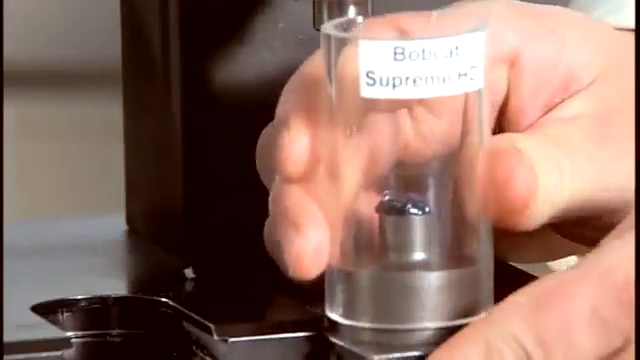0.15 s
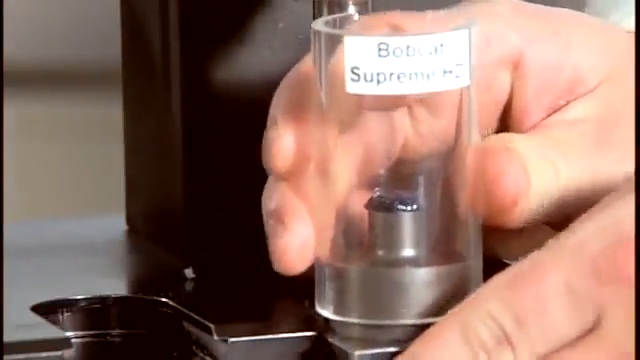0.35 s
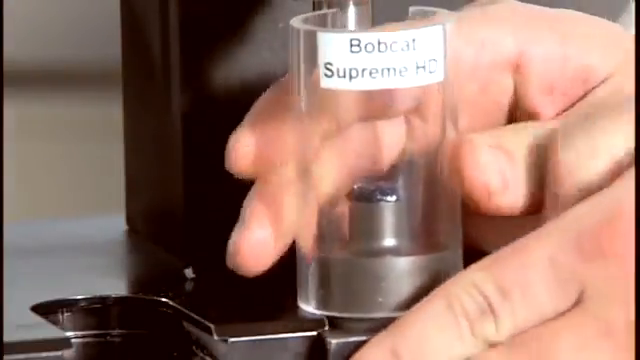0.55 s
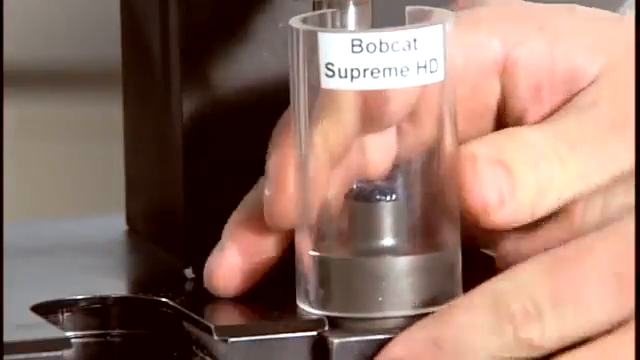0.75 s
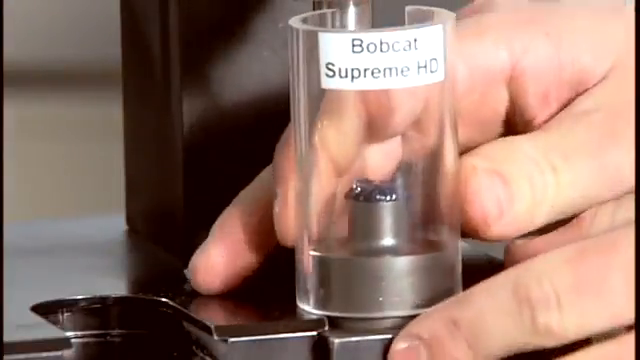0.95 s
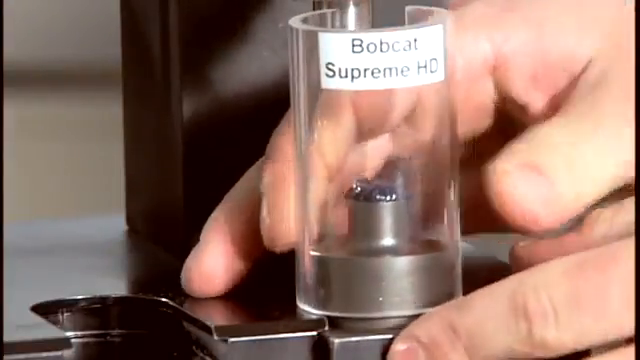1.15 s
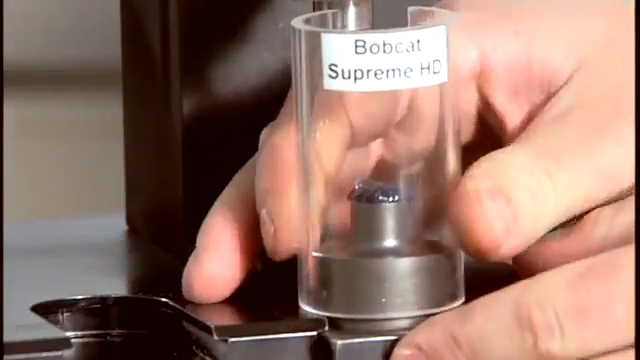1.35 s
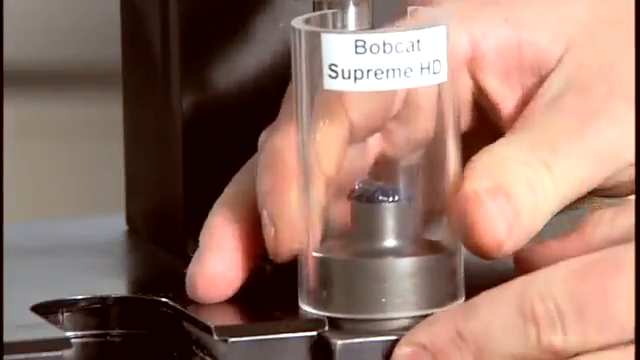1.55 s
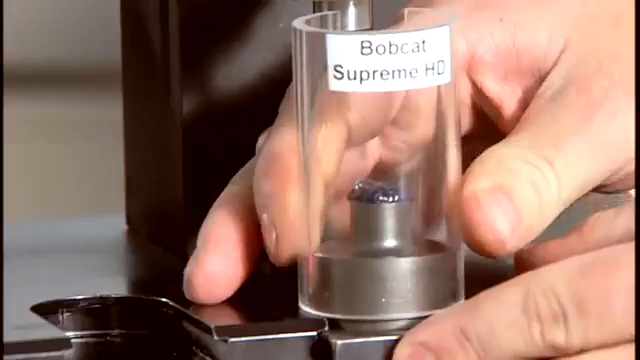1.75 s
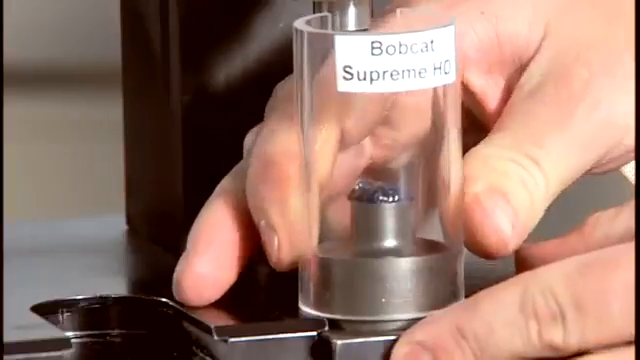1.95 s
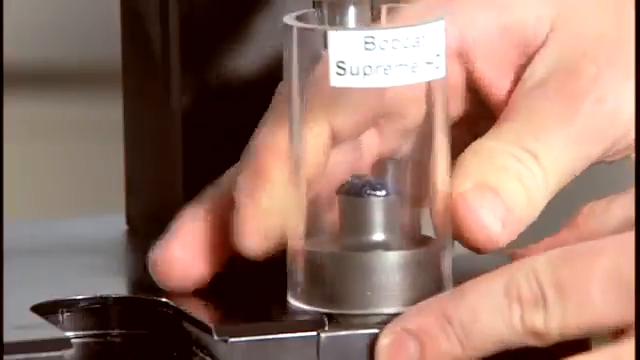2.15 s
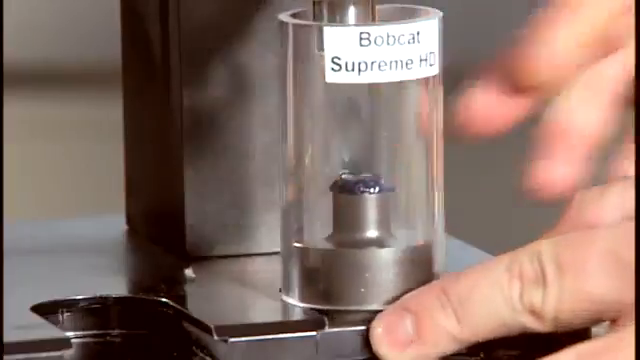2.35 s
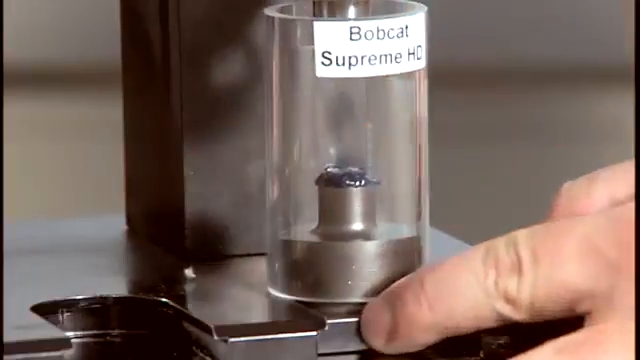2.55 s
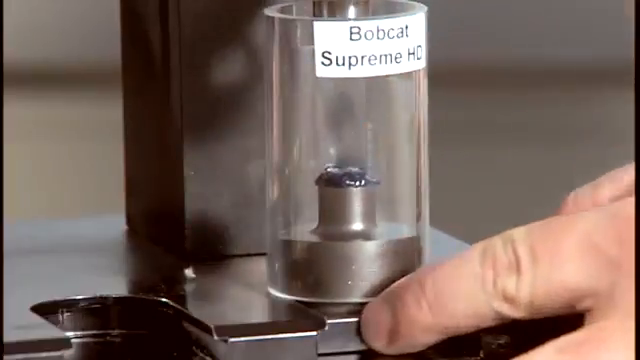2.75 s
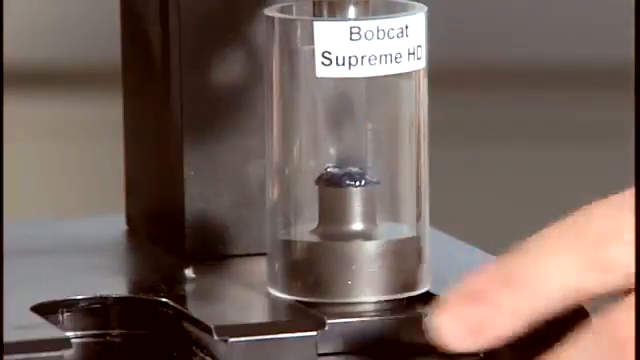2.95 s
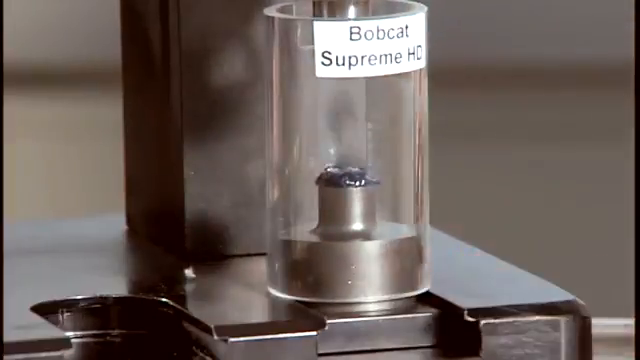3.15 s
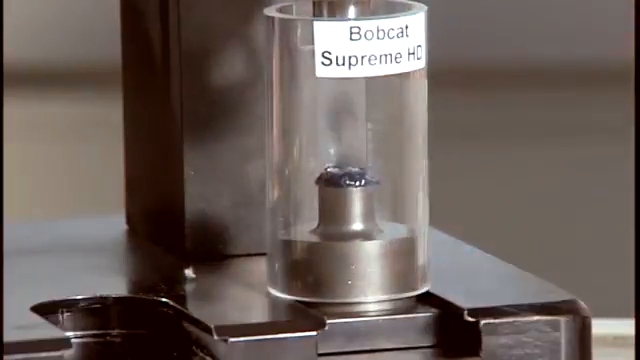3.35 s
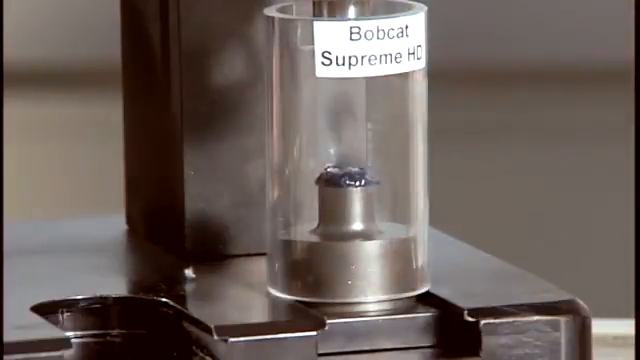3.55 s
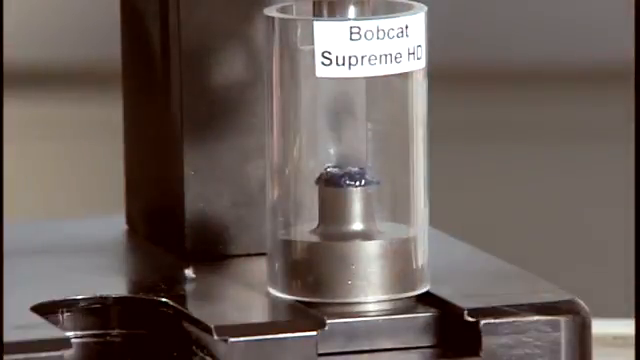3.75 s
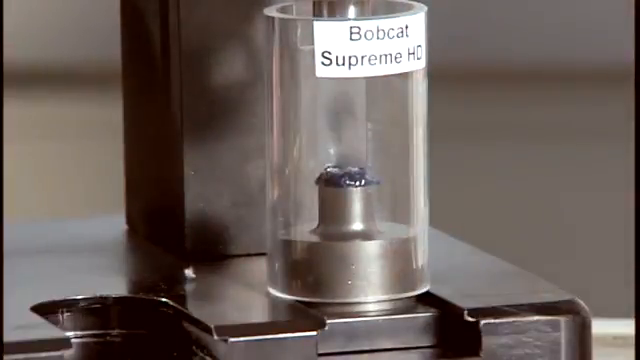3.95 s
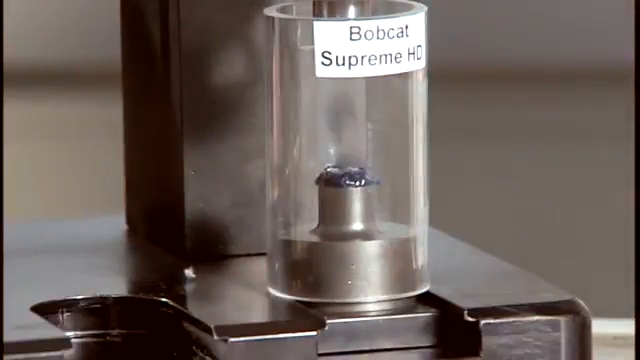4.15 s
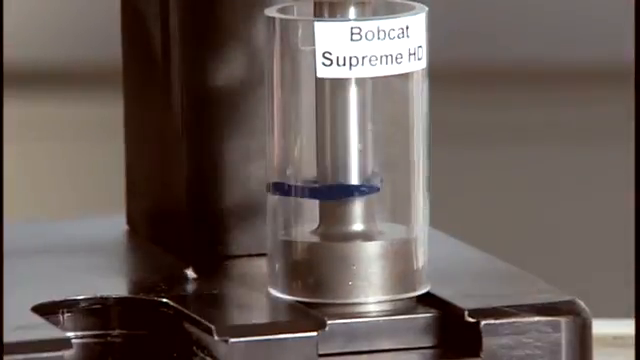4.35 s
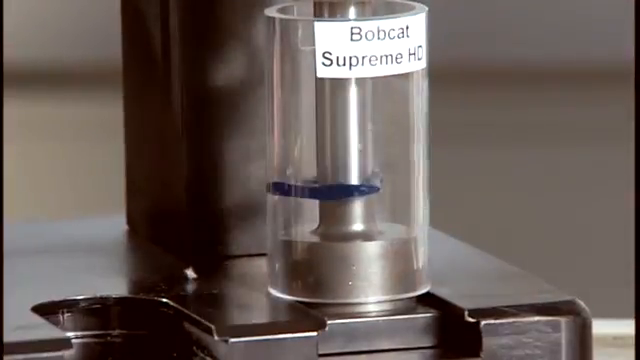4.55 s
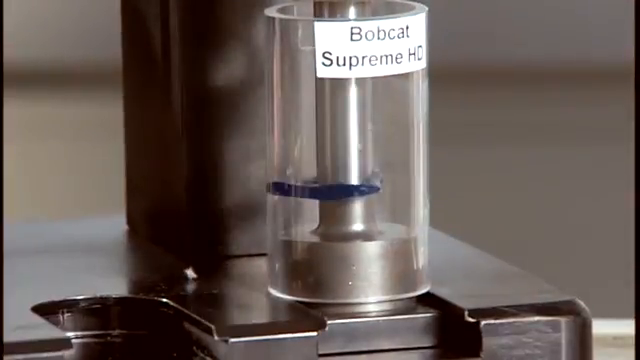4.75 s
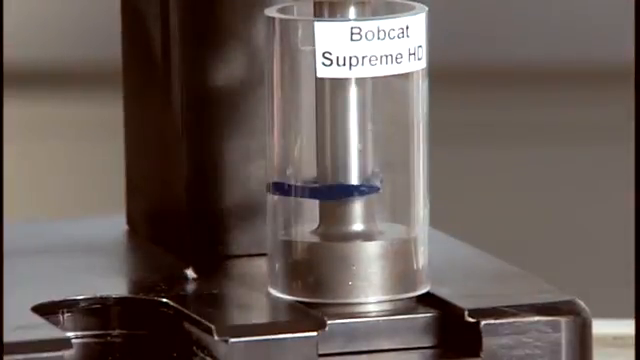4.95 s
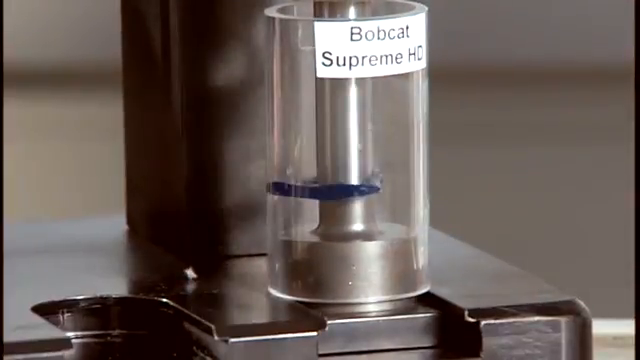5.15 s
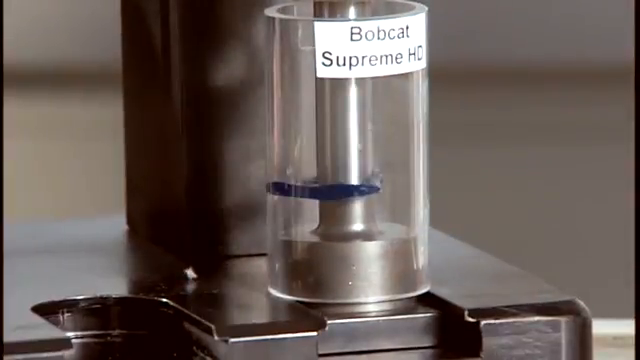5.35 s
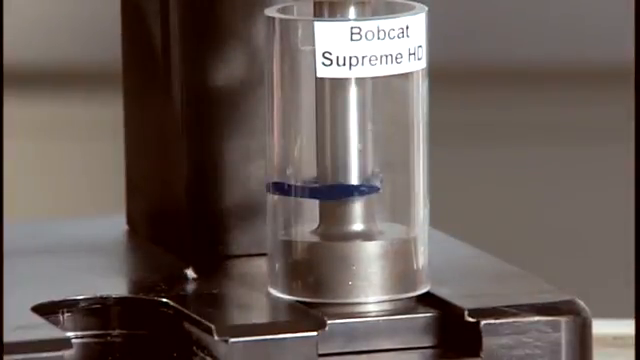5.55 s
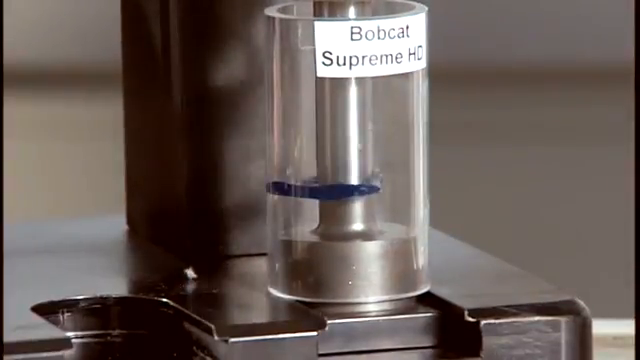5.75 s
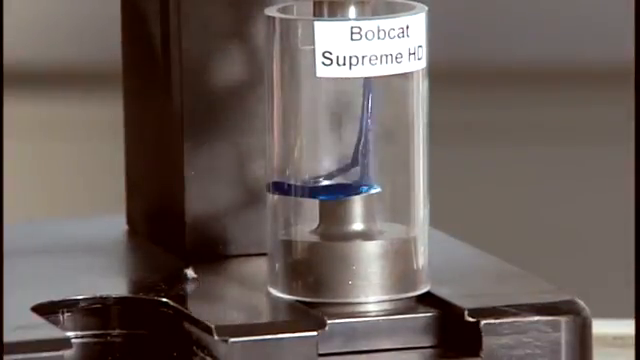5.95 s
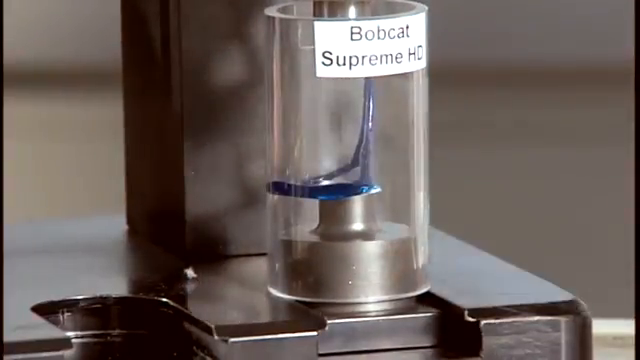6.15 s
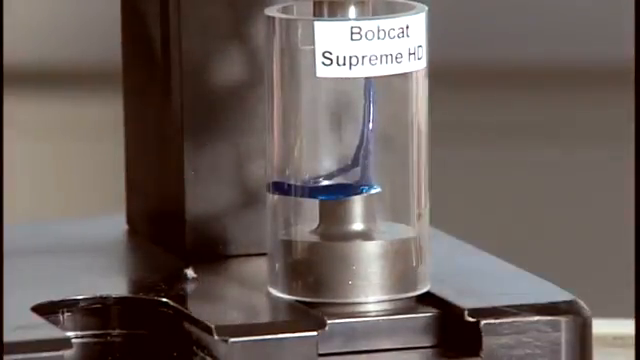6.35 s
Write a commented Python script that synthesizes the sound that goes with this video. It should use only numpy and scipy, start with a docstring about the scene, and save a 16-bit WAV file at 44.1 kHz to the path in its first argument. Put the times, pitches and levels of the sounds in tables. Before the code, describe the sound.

Hands fidget parts into place with clicks and soft rustling, a steel ram slams hard with a rattling ring, then clacks back up.

```python
"""Pneumatic impact rig in a small workshop

Hands seat a plastic tube and steel holder on the base plate: filtered noise knocks excite damped and ringing modes.
Short noise clicks make the ticks, and grainy noise the rustling sleeves. The ram slams onto the anvil, the frame
rattles, air vents as gated hiss and the ram clacks back up. Wavering sines and shaped noise make fan, mains hum
and hiss under all; heavy blows thud in the bench, a faint thin tone comes and goes, and the room adds a tail.
"""
import sys
import numpy as np
from scipy import signal
from scipy.fft import rfft, irfft, next_fast_len
from scipy.io import wavfile
from scipy.ndimage import uniform_filter1d

SR = 44100
rng = np.random.default_rng(int(sys.argv[2]) if len(sys.argv) > 2 else 0)


def wrap_up_sound(samples):
    """Save the sound to the file named by the first command line argument, as 16-bit audio."""
    columns = np.atleast_2d(samples).T
    # keep every value between -1 and 1, then stretch to whole-number steps
    tamed = np.clip(columns, -1, 1)
    steps = np.round(tamed * 32767).astype(np.int16)
    wavfile.write(sys.argv[1], SR, steps)


N = 286650
PAD = 4096  # samples ahead of time zero, so that a blow may start before it
t = np.arange(N) / SR

# long rings of the steel anvil: (frequency [Hz], level [dB], t60 [s])
ANVIL_MODES = [(1233, -6, 0.38), (1610, -14, 0.45), (1680, -15, 0.57), (2353, -12, 0.67), (3203, -13, 0.45),
               (3666, -12, 0.42), (3854, -22, 0.44), (4226, -23, 0.45), (4344, -16, 0.32),
               (4872, -13, 0.49), (5087, -18, 0.31), (5195, -26, 0.65), (5351, 0, 0.19), (5475, -17, 0.34),
               (5970, -35, 0.58), (6584, -18, 0.45), (7058, -17, 0.32), (7827, -15, 0.29),
               (8021, -28, 0.55), (8263, -17, 0.3), (8769, -21, 0.35), (9076, -23, 0.38), (9119, -24, 0.34),
               (9792, -21, 0.21), (9975, -14, 0.17), (10380, -20, 0.21), (10900, -21, 0.18),
               (12070, -16, 0.11), (13950, -28, 0.17), (14900, -27, 0.21), (1095, -14, .4), (1440, -16, .6),
               (1838, -12, .5), (3355, -14, .45)]
# broad resonances of the plastic tube: (frequency [Hz], level [dB], t60 [s])
TUBE_MODES = [(594, -1, 0.025), (1143, 2, 0.01), (1716, 3, 0.01), (2540, 0, 0.0046), (3838, 3, 0.015),
              (5830, -1.5, 0.0066)]


def undb(db):
    """Amplitude ratio of a level in decibels."""
    return 10 ** (np.asarray(db) / 20)


def decay(age, t60):
    """Exponential damping: the level falls by 60 dB in t60 seconds."""
    return np.exp(-np.log(1000) * age / t60)


def colour(x, points):
    """Zero-phase spectral shaping: gain in dB runs straight between (Hz, dB) points over log frequency."""
    hz, db = np.transpose(points)
    size = next_fast_len(len(x))
    f = np.maximum(np.arange(size // 2 + 1) * SR / size, 1)
    gain = undb(np.interp(np.log(f), np.log(hz), db))
    return irfft(rfft(x, size) * gain, size)[:len(x)]


def level(x, db):
    """Scales a signal to an rms level in dB."""
    return x * undb(db) / np.sqrt(np.mean(x ** 2))


def walk(rate):
    """Slow random modulation of rms 1: random steps, rate of them a second, smoothed by two moving averages."""
    k = int(SR / rate)
    steps = np.repeat(rng.standard_normal(N // k + 1), k)
    smooth = uniform_filter1d(uniform_filter1d(steps, k), k)
    return level(smooth[:N], 0)


def add(track, s, sound):
    """Superposition: mixes a sound into a padded track at time s."""
    i = PAD + int(s * SR)
    sound = sound[:len(track) - i]
    track[i:i + len(sound)] += sound


def rings(modes, split_hz=0.):
    """Modal decay: one damped sine a row, with a weaker twin that beats against it if split_hz is not zero."""
    hz, db, t60 = np.array(modes).T[:, :, None]
    s = t[:SR * 3 // 4]
    # the random split grows with the square of frequency; split_hz is its spread at 4 kHz
    twin_hz = hz + split_hz * (hz / 4000) ** 2 * rng.standard_normal(hz.shape)
    pair = np.sin(2 * np.pi * hz * s) + .4 * np.sin(2 * np.pi * twin_hz * s)
    fade = np.minimum((s[-1] - s) / .1, 1)
    return undb(db) * pair * decay(s, np.maximum(t60, .003)) * fade


def workshop():
    """Tonal machine noise: wavering motor and mains lines over broadband rumble and hiss."""
    # fan and mains hum: (frequency [Hz], level [dB rms], waver [dB])
    hum_lines = [(28.5, -65.5, -1.5), (53.2, -51.5, 2), (107.3, -59, 0), (119.46, -54, -0.5),
                 (154.8, -72, 4), (237.7, -71.5, 2)]
    # room and microphone noise: (frequency [Hz], relative density [dB per Hz])
    floor_spectrum = [(12, -5.5), (30, 0), (60, -3.5), (100, -4.5), (160, -10.5), (300, -19), (600, -25.5),
                      (1200, -34.5), (2500, -40), (6000, -45), (15000, -49.5)]
    floor_db = -53  # rms
    lines = 0
    for hz, db, waver_db in hum_lines:
        gain = np.sqrt(2) * undb(db + waver_db * walk(2.5))
        cycles = hz * t + rng.random() + .015 * walk(2.5)
        lines = lines + gain * np.sin(2 * np.pi * cycles)
    return lines + level(colour(rng.standard_normal(N), floor_spectrum), floor_db)


def blows(table, metal_modes, body_modes, crack_db):
    """Impact excitation: noise drives a damped body and steel modes ring; row two is what shakes the frame."""
    lead = 128  # silent samples ahead of each blow, room for the zero-phase filter
    out = np.zeros((2, N + PAD))
    metal, body = rings(metal_modes, split_hz=20.2), rings(body_modes)[:, :2048]
    age = t[:metal.shape[1]]
    for s, db, bass_db, edge_db, treble_db, t60, ring_db, frame_db in table:
        # every blow lands on another spot, so the modes share out a little differently
        steel, hollow = (undb(1.5 * rng.standard_normal(len(m))) * (-1) ** np.arange(len(m)) @ m
                         for m in (metal, body))
        contact = np.minimum(age / 0.00044, 1) * decay(age, np.clip(t60, .01, .2))
        push, crack = rng.standard_normal((2, len(age))) * contact
        # the push sounds through the body, the crack goes straight to the air
        clatter = signal.fftconvolve(push, hollow)[:len(age)] + undb(crack_db) * crack
        clatter /= np.sqrt(np.sum(hollow ** 2) + undb(2 * crack_db))
        tilt = [(80, bass_db - 33), (300, bass_db + 5), (450, bass_db + 2), (800, bass_db + 3),
                (1500, 0.013), (3700, edge_db), (8000, treble_db), (15000, treble_db - 10.5)]
        # the rings build up over the first ms of contact
        ring = undb(ring_db) * steel * np.minimum(age / 0.0027, 1)
        for track, sound in zip(out, (clatter + ring, undb(frame_db) * clatter)):
            add(track, s - lead / SR, undb(db) * colour(np.pad(sound, lead), tilt))
    return out


def slams():
    """Hard steel impact: an earlier blow rings out, then the ram comes down on the grease and on steel."""
    # (time [s], level [dB], bass [dB], edge near 4 kHz [dB], treble near 8 kHz [dB],
    #  clatter t60 [s], ring [dB], frame [dB])
    slam_table = [(-.03, -40.5, -8, -5, -19, 0.09, -9, 0), (4.2955, -52, -2, 0, 0, 0.058, -30, -10),
                  (4.3137, -28, -1.5, -3, -1, 0.07, -27, 1), (4.3258, -17, 1, 0, -4, 0.042, -12.5, -7.5)]
    # broad resonances of the ram: (frequency [Hz], level [dB], t60 [s])
    ram_modes = [(1159, 5, 0.027), (1740, -6, 0.011), (3260, 1, .005)]
    return blows(slam_table, ANVIL_MODES, ram_modes, crack_db=19)


def room(x):
    """Reverberation: weak frame modes and wall echoes form a dense tail, each octave dying at its own pace."""
    # decay of the tail: (frequency [Hz], t60 [s])
    tail_decay = [(150, 0.68), (500, 0.63), (2000, 0.48), (6000, 0.4), (12000, 0.27)]
    gap_s = 0.002  # silence before the tail, and then the time of its rise
    hz, t60 = np.transpose(tail_decay)
    age, tail = t[:SR * 3 // 4], 0
    for centre in 125 * 2. ** np.arange(8):
        octave = [(centre / 2, -40), (centre / 1.9, -3), (centre, 0), (centre * 1.7, -3), (centre * 2, -40)]
        band = colour(rng.standard_normal(len(age)), octave)
        tail = tail + band * decay(age, np.interp(np.log(centre), np.log(hz), t60))
    tail = tail * np.clip(age / gap_s - 1, 0, 1)
    return signal.fftconvolve(x, tail / np.sqrt(np.sum(tail ** 2)))[:len(x)]


def sleeves():
    """Stick-slip friction of fibres: a soft grainy hiss swells and fades with each move."""
    # moves: (loudest time [s], level [dB], rise over 12 dB [s], fall over 12 dB [s])
    moves = [(.62, -66, .35, .1), (1.31, -64.5, .12, .1), (1.8, -64, .4, .35), (2.35, -61, .25, .3),
             (3.32, -64.5, .6, .55), (6.38, -70, .2, .2)]
    # colour of the cloth: (frequency [Hz], relative density [dB per Hz])
    cloth_spectrum = [(200, -9), (700, 5), (1500, -4), (3000, -7.5), (6000, -15.5), (10000, -14),
                      (15000, -35)]
    gain = 0
    for s, db, rise, fall in moves:
        distance = (t - s) / np.where(t < s, rise, fall)
        gain = gain + undb(db - 12 * distance ** 2)
    grains = rng.standard_normal(N) * undb(1.38 * walk(300) + 0.6 * walk(25))
    return gain * level(colour(grains, cloth_spectrum), 0)


def knocks():
    """Contact stiffness: of these light knocks of holder and tube, the duller have more bass and last longer."""
    # (time [s], level [dB], edge near 4 kHz [dB], treble near 8 kHz [dB])
    knock_table = [(.195, -48, -28, -32), (.2398, -39, -6.5, -30), (.2843, -52, -20, -24),
                   (.332, -52.5, -22, -20), (.4645, -48, -20, -22), (.5254, -48.5, -17, -22),
                   (.573, -50, -6, -3), (.598, -47, -22, -26), (.644, -39.5, -1, -14),
                   (.6485, -30, -3, -12), (.7225, -29, -3, -11), (.7815, -40.5, -22, -26),
                   (.8484, -37, -3, -20), (1.3075, -40.5, -23, -30), (1.3521, -34.5, -10, -29),
                   (1.53, -46, -16, -20), (2.2179, -36.5, -8, -20), (2.227, -37, -7, -18),
                   (2.266, -48, -14, -19), (2.3067, -43, -6, -8), (2.359, -41, -5, -7),
                   (2.373, -45, -10, -8), (5.8062, -40, -1.5, -12), (5.839, -49, -7, -10),
                   (5.8562, -39.5, -4, 0)]
    # long rings of the holder: (frequency [Hz], level [dB], t60 [s])
    holder_modes = [(598, -4, .12), (1690, -8, .12), (2169, -16, .15), (2353, -20, .6), (3365, -22, .4),
                    (3666, -8, .28), (3865, -4, .16), (5346, -13, .22), (5626, -12, .2), (5846, -10, .22),
                    (7488, -20, .22), (8700, -18, .15)]
    base_bass_db, bass_per_dull_db = -3, .15
    base_t60_s, t60_s_per_dull_db = .042, .0008
    ring_db, frame_db = -19, -14
    contacts = []
    for s, db, edge_db, treble_db in knock_table:
        dull_db = -edge_db
        bass_db = base_bass_db + bass_per_dull_db * dull_db
        t60 = base_t60_s + t60_s_per_dull_db * dull_db
        contacts.append((s, db, bass_db, edge_db, treble_db, t60, ring_db, frame_db))
    return blows(contacts, holder_modes, TUBE_MODES, crack_db=15.5)


def ticks():
    """Brief impulses have broad spectra: millisecond noise clicks, dull or sharp."""
    # dry ticks of fingers, cloth and valves: (time [s], level [dB], treble at 9 kHz [dB])
    tick_table = [(.349, -49, -9), (.374, -45, -7), (1.0435, -37, -10), (1.0715, -31.5, -12),
                  (1.1677, -45, -22), (1.4604, -45, -1), (1.4684, -35, -6), (1.753, -51, 4),
                  (1.9276, -41.5, -4), (1.9455, -48.5, 6), (2.2973, -33, -14.5), (2.318, -42, -9),
                  (2.3435, -32, -17.5), (2.4707, -43, 0), (4.2021, -45, -11.5), (4.2163, -34.5, -14),
                  (5.7874, -38, -8), (5.9024, -36, -20)]
    out = np.zeros(N + PAD)
    for s, db, treble_db in tick_table:
        # 64 silent samples leave room for the zero-phase filter
        click = np.pad(rng.standard_normal(512) * np.exp(-t[:512] / 0.0006), (64, 0))
        tilt = [(300, -20), (1200, 1), (2500, -2), (9000, treble_db), (15000, treble_db - 3.5)]
        add(out, s - 64 / SR, undb(db) * colour(click, tilt))
    return out


def thuds():
    """Modal response of the bench: heavy blows set its low modes ringing, and loose joints make them flutter."""
    # bench modes: (frequency [Hz], level [dB], t60 [s])
    bench_modes = [(90.6, -1, 0.31), (128.7, 4, 0.29), (165.6, 4.5, 0.32), (196, -1, .38), (120, 14, .03),
                   (300, 9, .025), (244.7, -2, 0.42), (344, -11, 0.35)]
    # heavy blows: (time [s], peak level [dB])
    thud_table = [(0.723, -43.5), (2.344, -38), (2.468, -38), (2.533, -32), (4.306, -46), (4.323, -19.5),
                  (5.969, -38.5)]
    flutter_share, flutter_hz = .45, 40  # share 0-1, random steps a second
    out, low = np.zeros(N + PAD), rings(bench_modes)
    for s, db in thud_table:
        # each mode takes its own stretch of the walk
        flutter = walk(flutter_hz)[:low.size].reshape(low.shape)
        strengths = undb(2.0 * rng.standard_normal(len(low)))
        thud = strengths @ (low * (1 - flutter_share + flutter_share * flutter))
        add(out, s, thud * undb(db) / np.abs(thud).max())
    return out


def whine():
    """Amplitude and frequency modulation: a faint thin tone, unsteady in both, comes and goes."""
    # (start [s], length [s], level [dB])
    whine_table = [(2.06, 0.11, -70), (3.32, 0.067, -71), (5.35, 0.28, -79)]
    centre_hz = 1230
    gate = sum(undb(db) * np.sin(np.pi * np.clip((t - s) / length, 0, 1)) for s, length, db in whine_table)
    gain = np.sqrt(2) * gate * undb(2.7 * walk(30))
    pitch_hz = centre_hz * (1 + .004 * walk(25))
    return gain * np.sin(2 * np.pi * np.cumsum(pitch_hz) / SR)


def holder_clacks():
    """Impact on a lightly damped plate: the holder slides home against the end stop and the plate rings."""
    # (time [s], level [dB], bass [dB], edge near 4 kHz [dB], treble near 8 kHz [dB],
    #  clatter t60 [s], ring [dB], frame [dB])
    clack_table = [(2.4967, -31, -8, 0, 3, .1, -16, -10), (2.5333, -21, -3, 0, 0, .05, -15, -10)]
    # long rings of the plate: (frequency [Hz], level [dB], t60 [s])
    plate_modes = [(560, -14, 0.4), (2353, -12, 0.72), (3365, -18, 0.5), (3860, -6, 0.26), (4872, -20, 0.4),
                   (5082, -19, 0.28), (5346, -18, 0.28), (5475, -21, 0.36), (5626, -3, 0.16),
                   (5739, -19, 0.29), (6320, -18, 0.25), (6751, -15, 0.3), (6993, -9, 0.24),
                   (7095, -20, 0.33), (7348, -30, 0.52), (7590, -18, 0.19), (8323, -14, 0.2),
                   (8425, 0, 0.096), (9006, -11, 0.16), (9308, 0, 0.096), (9798, -21, 0.21),
                   (10030, -21, 0.23), (10520, -21, 0.16), (10930, -29, 0.27)]
    return blows(clack_table, plate_modes, TUBE_MODES, crack_db=22)


def rattle():
    """Repeated random contacts: loose parts chatter and keep the anvil ringing; row two rings on in the frame."""
    # (start [s], level [dB], hold [s], t60 [s], treble t60 [s], anvil [dB], frame [dB])
    rattle_settings = (4.335, -35, 0.035, .28, .16, -36.5, -6)
    s, db, hold, t60, treble_t60, anvil_db, frame_db = rattle_settings
    age = t[:SR // 2]
    chatter = rng.standard_normal(len(age)) * undb(3.2 * walk(201)[:len(age)]) * np.minimum(age / .005, 1)
    fading = np.maximum(age - hold, 0)
    slow, quick = chatter * decay(fading, t60), chatter * decay(fading, treble_t60)
    # broad colour of the frame, its treble dying sooner
    sound = colour(slow, [(200, 7), (700, 0), (1150, 2.5), (1800, 3), (2100, -2.5), (2800, -12),
                          (3500, -2), (4400, -2.5), (5300, -1), (6300, -3), (9000, -30)])
    sound += colour(quick, [(4500, -40), (6500, 1), (8500, 3), (10000, 1), (11500, -9), (15000, -13)])
    anvil = signal.fftconvolve(quick, rings(ANVIL_MODES).sum(axis=0))
    out = np.zeros((2, N + PAD))
    add(out[0], s, undb(db) * sound)
    add(out[0], s, undb(db + anvil_db) * anvil)
    add(out[1], s, undb(db + frame_db) * sound)
    return out


def air():
    """Turbulent jet noise: broadband hiss through the valve ports, gated by each vent."""
    # (start [s], rise [s], hold [s], fall [s], level [dB rms], centre [Hz], slope above it [dB/octave])
    vents = [(4.829, 0.047, 0.053, 0.039, -62, 1400, -8), (5.785, .002, .01, 0.028, -60.5, 8800, -2)]
    out = 0
    for s, rise, hold, fall, db, hz, slope_db in vents:
        gate = np.interp(t, s + np.cumsum([0, rise, hold, fall]), [0, 1, 1, 0])
        spectrum = [(hz / 8, -14), (hz / 2, -2), (hz, 0), (hz * 16, 4 * slope_db)]
        out = out + gate * level(colour(rng.standard_normal(N), spectrum), db)
    return out


def ram_return():
    """Impact at the end of travel: the ram hits its upper stop, whose broad and long modes respond."""
    # (time [s], level [dB], bass [dB], edge near 4 kHz [dB], treble near 8 kHz [dB],
    #  clatter t60 [s], ring [dB], frame [dB])
    return_table = [(5.9704, -26, -1, 1, 1, 0.05, -17, -10.5)]
    # long rings of the upper stop: (frequency [Hz], level [dB], t60 [s])
    stop_modes = [(560, -15, 0.32), (1873, -13, 0.58), (2089, 0, 0.16), (2353, -20, 0.7), (3666, -18, 0.45),
                  (4404, -26, 0.62), (5082, -9, 0.37), (5216, -7, 0.19), (5346, -5, 0.22),
                  (5469, -15, 0.33), (5620, -10, 0.27), (6137, -18, 0.37), (7079, -17, 0.44),
                  (8021, -21, 0.32), (8263, -16, 0.31), (8893, -15, 0.2), (9119, -14, 0.25),
                  (10430, -5, 0.24), (10600, -13, 0.2), (11020, -19, 0.16)]
    # broad resonances of the upper stop: (frequency [Hz], level [dB], t60 [s])
    buffer_modes = [(1050, 0.77, .01), (2050, 3, .015), (5150, 0, .012), (7050, 1, .008), (9830, 1, 0.019)]
    return blows(return_table, stop_modes, buffer_modes, crack_db=21)


def scene():
    """Superposition of direct sound, reverberant tail and steady background."""
    direct, frame = slams() + knocks() + holder_clacks() + rattle() + ram_return()
    light_and_low = ticks() + thuds()
    room_db = -8  # share of ticks and thuds that feeds the tail
    rig = direct + light_and_low + room(frame + undb(room_db) * light_and_low)
    return (rig[PAD:] + workshop() + sleeves() + whine() + air())[None]


def record(dry):
    """Band limiting: the recorder's steep elliptic low-pass cuts the top."""
    top_hz = 15100
    return signal.sosfilt(signal.ellip(8, .2, 70, top_hz, fs=SR, output="sos"), dry)


dry = scene()
out = record(dry)
wrap_up_sound(out)
```